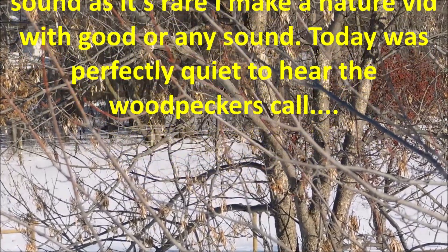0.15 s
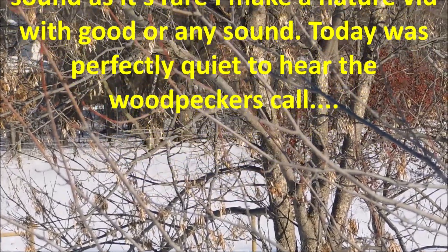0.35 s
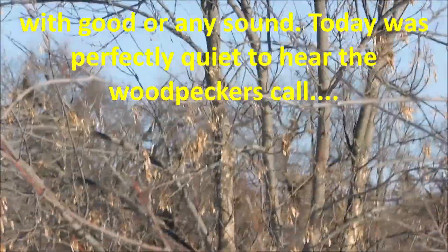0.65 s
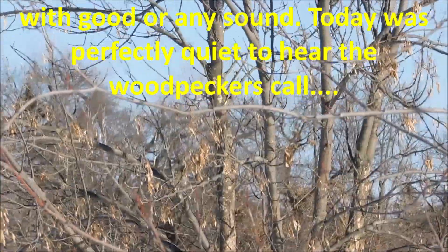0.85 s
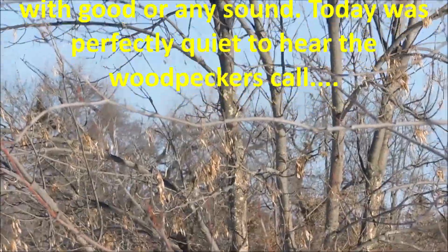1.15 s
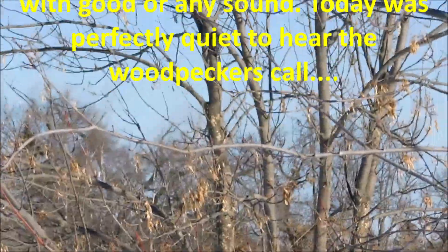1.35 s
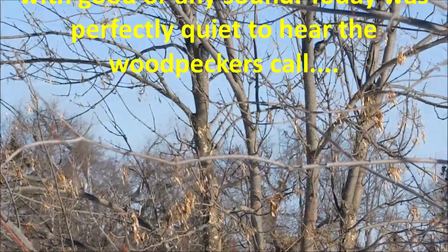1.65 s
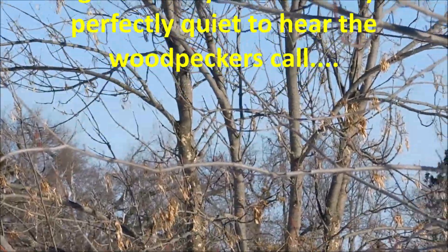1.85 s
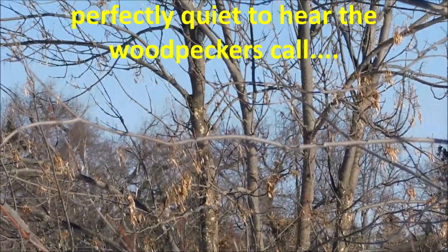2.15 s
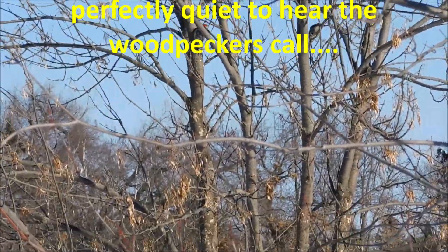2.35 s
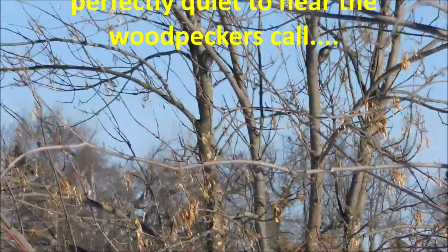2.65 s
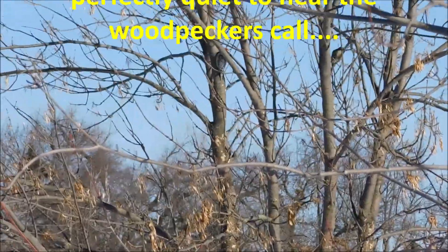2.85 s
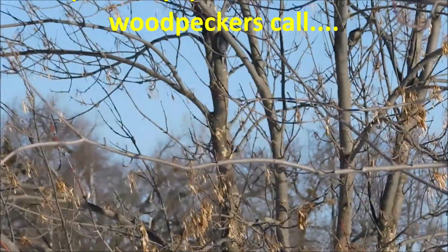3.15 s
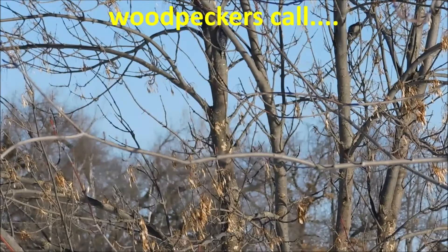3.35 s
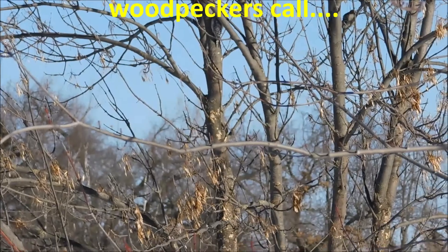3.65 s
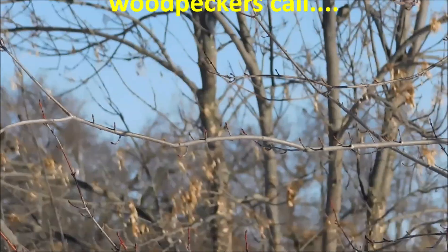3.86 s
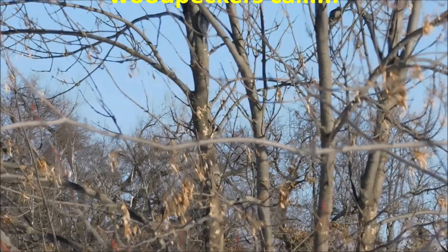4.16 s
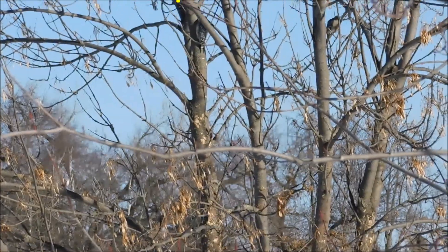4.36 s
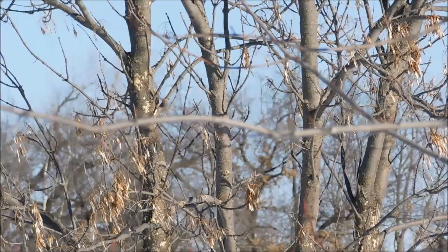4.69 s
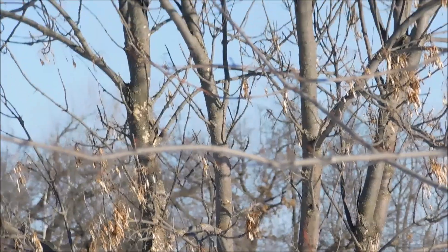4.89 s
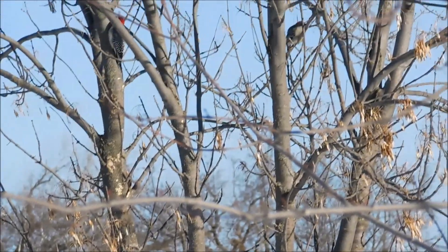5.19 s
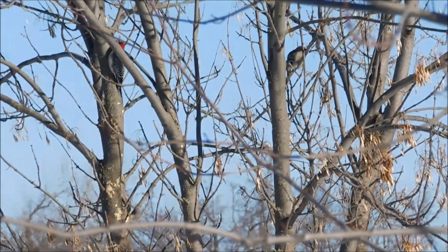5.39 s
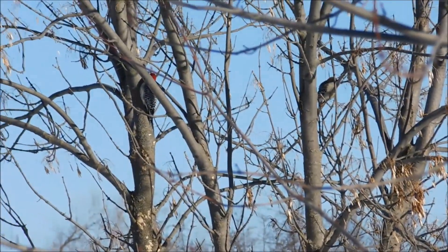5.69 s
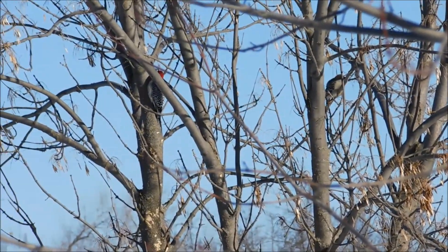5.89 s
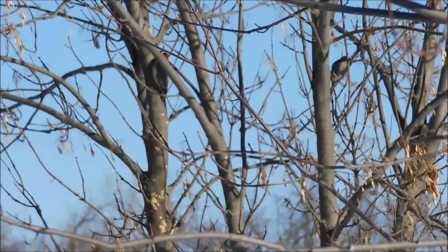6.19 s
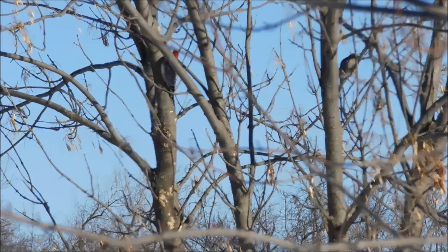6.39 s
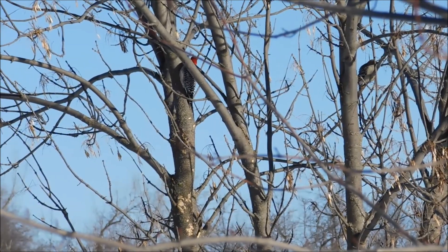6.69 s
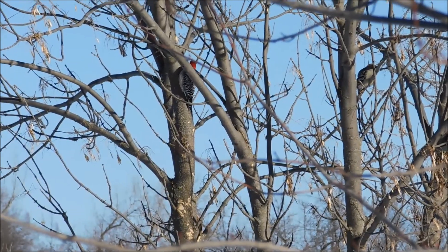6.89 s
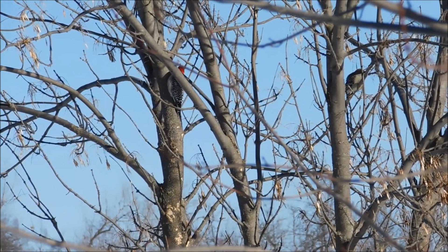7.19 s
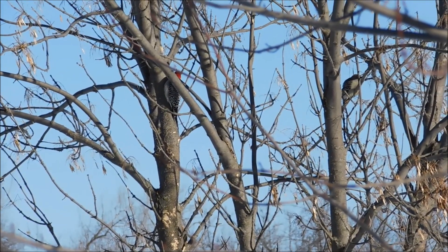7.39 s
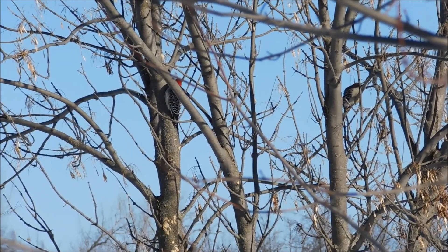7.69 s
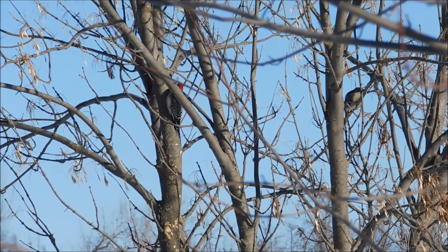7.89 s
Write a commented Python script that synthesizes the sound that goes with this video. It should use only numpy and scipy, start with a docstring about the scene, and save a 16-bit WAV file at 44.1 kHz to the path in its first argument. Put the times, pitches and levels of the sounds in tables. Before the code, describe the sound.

Still winter air outdoors: soft steady hiss, faint camera hum and a barely audible very high whine. A woodpecker, centred, gives loud calls under a fifth of a second long; each begins on a high, bright, overtone-rich note, breaks to a lower, weaker one and sags into breath, with short scattered echoes from trunks and twigs. Calls fall at about 0.2, 0.75, 1.7, 2.1, 3.0, 3.4, 5.1 and 6.5 seconds. Sharp hard case clicks strike at 0.3 and 0.8. Thin rising bird chips come at 0.7 and, fainter, 6.2. Fingers rub the camera lightly at 0.5 and around 2.7 to 3.1. Small lens ticks patter around 1.3, 2.7, 4.0 to 4.3 and 6.1 to 6.4. A faint motor whirrs briefly at 0.8 and 4.3, then almost continuously from 4.75. Soft low air rushes swell near 3.3 and 6.4. The ending is quiet.

```python
"""Woodpecker on a winter morning

A woodpecker calls eight times from bare trees on a still winter morning; a small bird chips twice.
Each call starts on a loud high note, breaks to a lower one and sags; trunks and twigs echo it.
The birds are built from gliding tones, the calls with overtones and breath; the air is coloured noise.
The hand-held camera adds two sharp clicks, soft ticks, rubs, hum, whirr and whine: rings, noise and tones."""
import sys
import numpy as np
from scipy import signal
from scipy.fft import rfft, irfft
from scipy.io import wavfile

SR = 44100
rng = np.random.default_rng(int(sys.argv[2]) if len(sys.argv) > 2 else 0)


def to_wav(sig):
    """Store sig (one row per channel, or 1-D mono) as 16-bit WAV at the path in sys.argv[1].

    Samples outside -1..1 are clipped; the rate is SR.
    """
    pcm = np.clip(np.atleast_2d(sig), -1, 1) * 32767
    pcm = np.round(pcm).astype(np.int16)
    wavfile.write(sys.argv[1], SR, pcm.T)  # frames by channels


N = 354608
TIME = np.arange(N) / SR  # seconds

# Levels in the tables are those going in, before panning, filters and echoes.
# still air and microphone hiss: f/Hz, relative level/dB
AIR_COLOUR = [(12, -39), (20, -9), (92, -19), (140, -14), (393, -16.5), (581, -8.5), (667, -7.5),
              (932, -12.5), (1040, -5), (1200, -10.5), (1670, -3), (2470, -15.5), (3260, -14), (3540, -20),
              (15500, -35)]
# how alike left and right are in the air (0 unrelated, 1 the same): f/Hz, likeness/1
AIR_LIKENESS = [(30, 0.37), (130, 0.95), (300, 0.4), (1400, 0), (3000, 0), (15000, 0)]
# soft low rush: f/Hz, relative level/dB
RUSH_COLOUR = [(200, -35), (450, -15), (700, -3), (950, -10), (1400, -12), (2500, -20.5), (6000, -47)]
# its swells: crest t/s, crest level/dB, rise/(dB per s), fade/(dB per s)
RUSH_SWELLS = [(3.3, -58.5, 26, 26), (6.42, -56.5, 52, 13.5)]
# resonances in the steady hum of the camera: f/Hz, width of one pass/Hz, level/dB
HUM_MODES = [(597.5, 29, 0.5), (1032.4, 52, 0.5), (1685, 143, -2.5), (2044, 87, -0.5), (2957, 110, -6)]
# electronic whine, two tones that beat: middle f/Hz, level/dB
WHINE_TONES = [(14780, -91), (14810, -89.5)]
# woodpecker calls: t/s, basic high note f/Hz, basic low note f/Hz, break after t/s, sag after t/s,
# high note drive level/dB, then starting settings of harmonics 1, 3 and 5: level/dB each
CALLS = [ (0.215, 1652, 1137, .034, .086, -31, -1, 4, -23),
         (0.748, 1578, 1220, 0.036, .092, -32.5, 2.5, -1, -13),
         (1.729, 1705, 1272, 0.04, 0.099, -33.5, -4, 6, -2.5),
         (2.106, 1619, 1242, 0.038, 0.088, -35, -1, 3.5, 3.5),
         (3.034, 1608, 1244, 0.041, 0.098, -36, 0.5, 5, -0.5),
         (3.377, 1598, 1269, .042, .088, -36, 4, 8.5, 2.5),
         (5.100, 1620, 1219, 0.039, 0.097, -35.5, 7.5, -1.5, 3),
         (6.459, 1543, 1173, 0.038, 0.1, -35, 2, 7.5, -4.5)]
# how throat and open bill pass the voice: f/Hz, level/dB
THROAT = [(600, -16), (1200, -3), (1600, -0.5), (2000, 3), (2450, -6.5), (3200, -7), (3800, -14.5),
          (4800, -20.5), (5500, -13.5), (6400, -13.5), (7400, -10.5), (8200, -22), (9000, -28),
          (16000, -29)]
# single trunks that answer clearly: delay t/s, level/dB, left minus right level/dB
TRUNK_ECHOES = [(.024, -19.5, 2), (0.069, -35, 12)]
# sharp clicks of the camera case: t/s, snap peak level/dB, left minus right level/dB,
# low thud level/dB, treble edge f/Hz
CASE_CLICKS = [(0.318, -13.5, -17.5, -58, 4160), (0.3195, -18.5, 13, -21.5, 3560),
               (0.3225, -23, 11, -20, 3000), (0.828, -18, 20, -11.5, 7100)]
# ring of the case: f/Hz, width/Hz, level/dB
CASE_MODES = [(850, 140, -34), (1214, 92, 9.5), (1750, 200, 11.5), (2280, 370, 12.5), (4840, 360, -1),
              (7300, 1500, -10)]
# fingers shifting on the camera: t/s, length t/s, starting level/dB, fade/(dB per s),
# left minus right level/dB, treble edge f/Hz
FINGER_RUBS = [(0.484, 0.0043, -43.5, 500, 7, 4000), (2.742, 0.003, -36, 600, 0, 3570),
               (2.755, 0.0042, -45.5, 500, 5, 6000), (2.957, 0.041, -39.5, 148, 8.5, 9000),
               (2.98, 0.17, -46, 11, 3.5, 12000)]
# sound of skin on the case: f/Hz, relative level/dB
RUB_COLOUR = [(59, -46), (100, -24.5), (313, -12.5), (403, -16), (712, -5), (1130, -2), (1920, -11.5),
              (2520, -1.5), (4020, -11), (4370, -12.5), (8060, -22.5), (13900, -25), (15500, -37)]
# thin dry ticks: t/s, peak level/dB, centre f/Hz
THIN_TICKS = [(0.559, -51, 5300), (1.14, -50, 5500), (2.875, -50, 6500), (6.075, -53, 1900),
              (6.229, -54, 11000)]
# small bird: t/s, start f/Hz, end f/Hz, length t/s, peak level/dB
CHIPS = [(0.684, 5240, 7250, 0.012, -46), (6.221, 5650, 7550, 0.019, -51.5)]
# runs of the camera motor: start t/s, length t/s, level/dB
WHIRR_RUNS = [(0.78, 0.29, -61), (4.335, 0.4, -68), (4.754, 1.027, -59), (5.762, 3.5, -61.5)]
# resonances in its whirr: f/Hz, width of one pass/Hz, level/dB
WHIRR_MODES = [(1776, 200, 4.5), (1871, 125, 3.5), (2550, 85, -7), (2920, 760, -10.5)]
# even steps of the lens drive: t/s, number of steps/1, level/dB, change per step/dB,
# stop knock against start knock level/dB
LENS_RUNS = [(1.243, 1, -60, 0, -16), (1.293, 1, -59.5, 0, -0.5), (1.360, 1, -58.5, 0, -3),
             (2.61, 1, -59.5, 3, -14), (2.657, 2, -58.5, -1, 1.5), (2.779, 2, -58, 2, -6),
             (3.264, 1, -58.5, 0, -20), (3.886, 1, -58, 0, -2), (3.996, 7, -59, 0.14, -13),
             (4.261, 2, -57.5, -2.5, -17), (6.128, 1, -60, 0, -3), (6.233, 5, -60.5, 0.8, -19),
             (6.433, 1, -55, 0, -6)]
# ring of the lens barrel: f/Hz, width of one pass/Hz, level/dB
LENS_MODES = [(315, 200, -2.5), (667, 370, 5), (992, 340, 12), (1450, 950, 2), (2170, 290, -3),
              (2870, 420, -4.5), (4000, 200, -4.5), (4800, 1200, -13)]


def undb(db):
    """Turn decibels into a gain: 20 dB is ten times the amplitude."""
    return 10 ** (np.asarray(db) / 20)


def unit(x):
    """Scale to an average strength (rms) of 1."""
    return x / np.sqrt(np.mean(x ** 2))


def at_pitch(points, hz):
    """Read a value between (Hz, value) points, with pitch spaced as we hear it (log scale)."""
    f, value = np.transpose(points)
    return np.interp(np.log(np.maximum(hz, 1)), np.log(f), value)


def bins(x):
    """List the frequencies in the spectrum of x, with 0 Hz raised to 1 Hz."""
    return np.maximum(np.fft.rfftfreq(x.shape[-1], 1 / SR), 1)


def colour(x, points):
    """Make some pitches of x stronger than others, following (Hz, dB) points."""
    return irfft(rfft(x) * undb(at_pitch(points, bins(x))), x.shape[-1])


def ring(x, modes, order=1):
    """Pass x through resonances side by side; order 2 passes each twice, for steeper skirts."""
    f = bins(x)
    response = 0
    for hz, width, db in modes:
        response = response + undb(db) / (1 + 1j * (f - hz ** 2 / f) / width) ** order
    return irfft(rfft(x) * response, x.shape[-1])


def dull(x, edge_hz):
    """Turn down the treble above an edge, gently."""
    return signal.sosfilt(signal.butter(2, edge_hz, fs=SR, output="sos"), x)


def pan(db):
    """Give left and right gains that differ by db; above 0 leans left."""
    return undb(np.array([[db], [-db]]) / 2)


def lag(x, right_ms):
    """Let the sound reach the right microphone this much later than the left."""
    late = np.array([[0], [right_ms / 1000]])
    return irfft(rfft(x) * np.exp(-2j * np.pi * bins(x) * late), x.shape[-1])


def add(out, s, x):
    """Mix x into out from time s."""
    i = int(s * SR)
    out[:, i:i + x.shape[-1]] += x[..., :N - i]


def walk(rate, size):
    """Wander at random, in straight lines between `rate` random points a second."""
    knots = np.arange(size) / SR * rate
    return np.interp(knots, np.arange(size), rng.standard_normal(size))


def gate(start_s, length_s, slew_s):
    """Switch on for a while, with smooth edges."""
    opening = np.tanh((TIME - start_s) / slew_s)
    closing = np.tanh((TIME - start_s - length_s) / slew_s)
    return (opening - closing) / 2


def stereo_noise(likeness, size):
    """Make noise that the two microphones partly share: a common part plus an opposed part."""
    mid, side = rfft(rng.standard_normal((2, size)))
    c = np.clip(likeness, -1, 1)
    opposed = np.sqrt(1 - c) * side * np.array([[1], [-1]])
    return irfft(np.sqrt(1 + c) * mid + opposed, size) / np.sqrt(2)


def still_air(level_db=-58.24, drift_db=0.5):
    """Quiet air and microphone hiss: coloured noise whose level drifts slightly."""
    noise = unit(colour(stereo_noise(at_pitch(AIR_LIKENESS, bins(TIME)), N), AIR_COLOUR))
    return undb(level_db + drift_db * walk(2.59, N)) * pan(1.35) * noise


def soft_rush(between_db=-74.5):
    """A soft low rush: coloured noise that swells twice above a quiet floor."""
    noise = unit(colour(stereo_noise(0.76, N), RUSH_COLOUR))
    swell = 0
    for crest_s, db, rise, fade in RUSH_SWELLS:
        below_crest_db = np.maximum(rise * (crest_s - TIME), fade * (TIME - crest_s))
        swell = swell + undb(db - below_crest_db)
    return np.hypot(swell, undb(between_db)) * pan(1.7) * noise


def camera_hum(level_db=-64):
    """A faint steady hum: noise narrowed by resonances, reaching the left side first."""
    noise = unit(ring(stereo_noise(0.82, N), HUM_MODES, order=2))
    return lag(undb(level_db) * pan(13.2) * noise, 0.15)


def electronic_whine(wander_hz=7):
    """Two very high tones beat against each other while their pitches waver."""
    out = 0
    for hz, db in WHINE_TONES:
        phase = 2 * np.pi * np.cumsum(hz + wander_hz * walk(30, N)) / SR
        out = out + np.sqrt(2) * undb(db) * np.sin(phase)
    return out


def call(high_hz, low_hz, break_s, sag_s, db, first_db, third_db, fifth_db):
    """One call: the syrinx holds a high note, breaks to a low one and slackens as the air runs out."""
    t = np.arange(int(0.18 * SR)) / SR
    broken = 1 / (1 + np.exp((break_s - t) / 0.00439))  # 0 on the high note, 1 on the low
    sagging = np.maximum(t - sag_s, 0)  # seconds since the sag began
    catching = np.exp(-(t / 0.012) ** 2)  # the moment when the tone starts

    # the high note starts sharp, dips and arches; the low note rebounds slightly
    high = high_hz * np.interp(t, [0, 0.006, 0.012, 0.022, 0.04], [1.03, 1.04, 0.965, 1.005, 0.985])
    low = low_hz * np.interp(t - break_s, [0, 0.017, 0.035, 0.06], [1.0, 0.98, 1.012, 0.975])
    hz = (high + (low - high) * broken) * np.exp(-8.5 * sagging)
    # the tone is rough while it catches, after the break and as it slackens
    unsteady = 0.0038 + 0.03 * (2 * catching + 0.68 * broken + 45 * sagging)
    phase = 2 * np.pi * np.cumsum(hz * (1 + unsteady * walk(1103, len(t)))) / SR

    # the drive drops at the break, to the same level in every call
    low_note_db = -44
    dropped = 1 / (1 + np.exp((break_s - t) / 0.0049))
    push_db = np.interp(t, [0, 0.008, 0.016, 0.03], [-17, -5.5, 0, 0])
    push_db = push_db + db + dropped * (low_note_db - db)
    # the voice gives way, then trails off
    push_db = push_db - 7 * np.tanh(sagging / 0.044) - 115 * sagging
    push = undb(push_db + 2 * broken * walk(196.3, len(t)))
    push = push * np.minimum(t / 0.00099, 1) * np.minimum((t[-1] - t) / 0.0075, 1)

    k = np.arange(1, 12)[:, None]  # harmonic numbers
    upper_db = -2.5 + 0.24 * fifth_db  # harmonics 6 to 11 partly follow the 5th
    own_db = np.array([first_db, 6.5, third_db, -6.5, fifth_db] + [upper_db] * 6)[:, None]
    own_db = own_db * (1 - 0.47 * broken)  # the low notes are more alike
    # through the high note the fundamental swells while the overtones mellow
    ripening = np.tanh((t - 0.022) / 0.0089) * (1 - broken)
    own_db = own_db + np.where(k == 1, 3, -0.5) * ripening
    # upper harmonics come last and die first; each flutters on its own
    dull_db = -(32 * np.maximum(t - break_s, 0) + 0.67 * catching) * np.minimum(k - 1, 4)
    flutter_db = 1.5 * np.minimum(k, 4) * np.array([walk(135.5, len(t)) for _ in k])
    gain = undb(at_pitch(THROAT, k * hz) + own_db + dull_db + flutter_db)
    partials = gain * np.sin(k * phase) * (k * hz < SR / 2)

    hiss_db = -24 + 20 * catching + 5.7 * broken + 15 * np.tanh(sagging / 0.024)
    hiss = undb(hiss_db) * unit(colour(rng.standard_normal(len(t)), THROAT))
    return push * (np.sqrt(2) * partials.sum(axis=0) + hiss)


def woodpecker():
    """All the calls, from one perch, equally loud on both sides."""
    out = np.zeros((2, N))
    for s, *voice in CALLS:
        add(out, s, call(*voice))
    return out


def trunks(x):
    """The nearest thick trunks each return a whole copy of the sound."""
    out = np.zeros((2, N))
    for delay, db, pan_db in TRUNK_ECHOES:
        add(out, delay, undb(db) * pan(pan_db) * x)
    return out


def trees(x):
    """Twigs close by, trunks further off and the distant wood each throw back many small echoes."""
    t = np.arange(SR) / SR
    echoes = 0
    # level/dB, build-up t/s, t/s to fade by 60 dB
    for db, delay, t60 in [(-10, 0.001, 0.072), (-9, 0.02, 0.29), (-24, 0.08, 1.3)]:
        burst = rng.standard_normal((2, SR)) * (1 - np.exp(-(t / delay) ** 2))
        burst = burst * np.exp(-np.log(1000) * t / t60)
        echoes = echoes + undb(db) * unit(burst) / np.sqrt(SR)
    # the echoes are weakest around 1600 Hz
    echoes = colour(echoes, [(700, 3.0), (1600, -5.5), (3200, -0.5), (7000, 1.5), (14000, 1.0)])
    return signal.fftconvolve(x, echoes, axes=1)[:, :N]


def clicks(thud_hz=260, thud_s=0.00064, size=4096):
    """A snap rings the stiff case for a few milliseconds and jolts both microphones."""
    out = np.zeros((2, N))
    snap = ring(signal.unit_impulse(size, size // 2), CASE_MODES)[size // 2:]
    snap = snap / np.abs(snap).max()
    t = np.arange(len(snap)) / SR
    thud = np.exp(-t / thud_s) * np.cos(2 * np.pi * thud_hz * t)
    for s, db, pan_db, thud_db, edge_hz in CASE_CLICKS:
        jolt = pan(pan_db) * snap + undb(thud_db) * thud
        add(out, s, undb(db) * dull(jolt, edge_hz))
    return out


def rubs(grain_db=3.0, release_s=0.01, size=16384):
    """Skin catches and slips on the case: grainy noise that dies away when the finger stops."""
    out, t = np.zeros((2, N)), np.arange(size) / SR
    for s, length, db, fade_db, pan_db, edge_hz in FINGER_RUBS:
        grip = undb(db - fade_db * t + grain_db * walk(500, size))
        grip = grip * np.exp(-np.maximum(t - length, 0) / release_s)
        onset = np.minimum(t / (0.15 * length), 1)
        scrape = dull(unit(colour(stereo_noise(0.57, size), RUB_COLOUR)), edge_hz)
        add(out, s, pan(pan_db) * grip * onset * scrape)
    return out


def thin_ticks(width_share=0.23, decay_s=0.0014, pan_db=3, size=1024):
    """Tiny ticks with no body: very short noise through a single resonance."""
    out, t = np.zeros((2, N)), np.arange(size) / SR
    for s, db, hz in THIN_TICKS:
        burst = stereo_noise(0.49, size) * np.exp(-t / decay_s)
        tick = ring(burst, [(hz, width_share * hz, 0)])
        add(out, s, undb(db) * pan(pan_db) * tick / np.abs(tick).max())
    return out


def small_bird():
    """Thin whistles that flick upwards: pure tones, quick to rise and then levelling off."""
    out = np.zeros((2, N))
    for s, start_hz, end_hz, length, db in CHIPS:
        u = np.linspace(0, 1, int(length * SR))  # 0 to 1 through the chip
        hz = start_hz + (end_hz - start_hz) * np.sin(np.pi / 2 * u)
        loudness = undb(db) * np.sqrt(4 * u * (1 - u))
        add(out, s, loudness * np.sin(2 * np.pi * np.cumsum(hz) / SR))
    return out


def motor_whirr(flutter_db=1.2, slew_s=0.027):
    """A motor runs now and then: fluttering noise through resonances, with smooth starts and stops."""
    running = sum(undb(db) * gate(s, length, slew_s) for s, length, db in WHIRR_RUNS)
    noise = unit(ring(stereo_noise(1.0, N), WHIRR_MODES, order=2))
    return lag(running * undb(flutter_db * walk(25, N)) * pan(7.4) * noise, 0.04)


def knock(bright_db, decay_s=0.011, click_s=0.0043, size=2048):
    """A brief rattle in the lens barrel; its treble is over first."""
    t = np.arange(size) / SR
    rattle = stereo_noise(0.71, size)
    body = colour(rattle * np.exp(-(t / decay_s) ** 2), [(1200, -2), (4000, -4), (9000, -23)])
    click = colour(rattle * np.exp(-(t / click_s) ** 2), [(1200, -25.5), (4000, 3), (9000, -11)])
    body, click = (unit(ring(part, LENS_MODES, order=2)) for part in (body, click))
    return body + undb(bright_db) * click


def lens_ticks(step_s=0.0333, stop_s=0.011, pan_db=7, scatter_db=0.5):
    """Each step of the lens drive knocks as it starts and again as it stops."""
    out = np.zeros((2, N))
    for s, steps, db, change_db, stop_db in LENS_RUNS:
        bright_db = -21.5 + 1.5 * s  # later runs are brighter
        for step in range(round(steps)):
            start_s = s + step * step_s
            step_db = db + change_db * step + scatter_db * rng.standard_normal()
            gain = pan(pan_db) * undb(step_db)
            add(out, start_s, gain * knock(bright_db))
            add(out, start_s + stop_s, gain * undb(stop_db) * knock(bright_db))
    return out


def scene(chip_echo_db=-3, case_lag_ms=0.12, bird_lag_ms=-0.024):
    """Birds among the trees; the camera's own noises get no echoes."""
    calls, chips = woodpecker(), small_bird()
    background = still_air() + soft_rush()
    echoes = trunks(calls) + trees(calls + undb(chip_echo_db) * chips)
    birds = lag(calls, bird_lag_ms) + chips + echoes
    handling = clicks() + thin_ticks() + lag(rubs() + lens_ticks(), case_lag_ms)
    machine = camera_hum() + electronic_whine() + motor_whirr()
    return background + birds + handling + machine


def record(dry):
    """The recorder cuts the top of the treble steeply, above 15800 Hz."""
    return signal.sosfilt(signal.ellip(10, 0.1, 70, 15800, fs=SR, output="sos"), dry)


dry = scene()
out = record(dry)
to_wav(out)
```